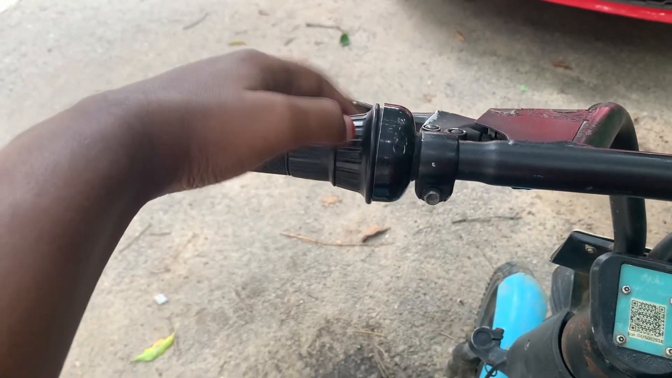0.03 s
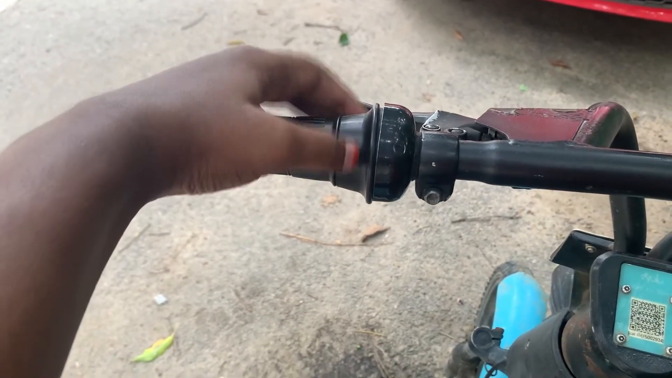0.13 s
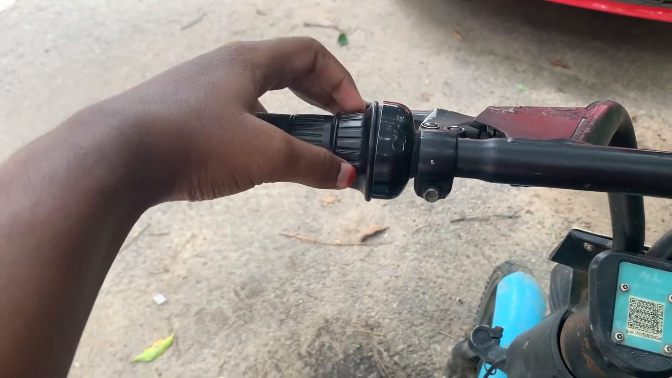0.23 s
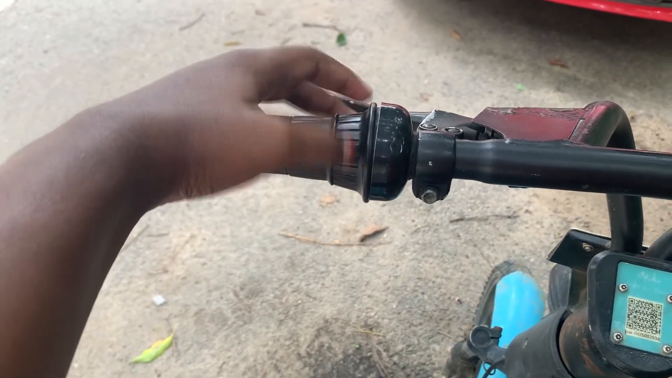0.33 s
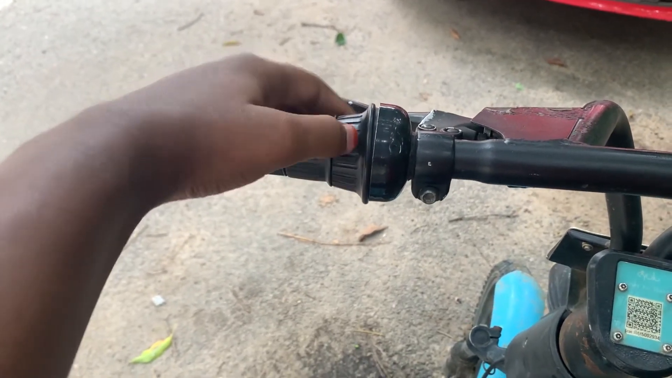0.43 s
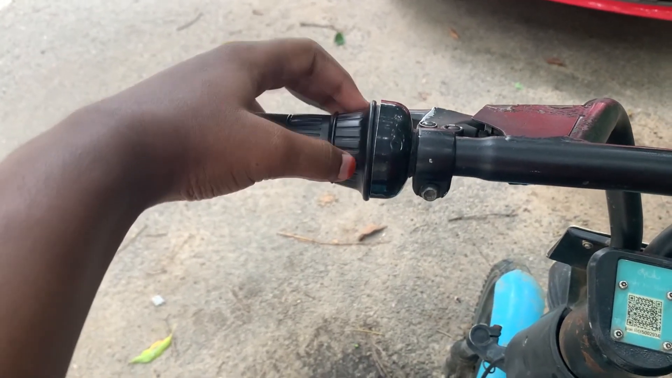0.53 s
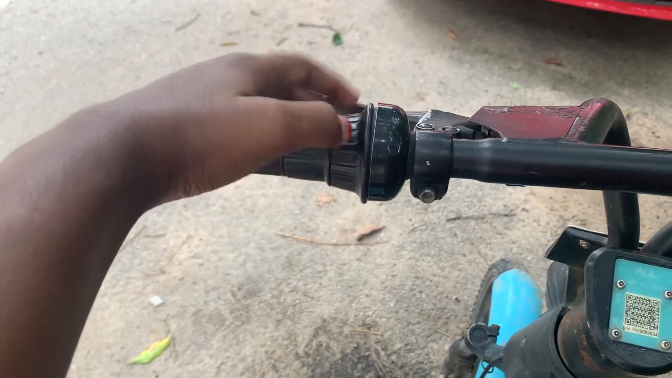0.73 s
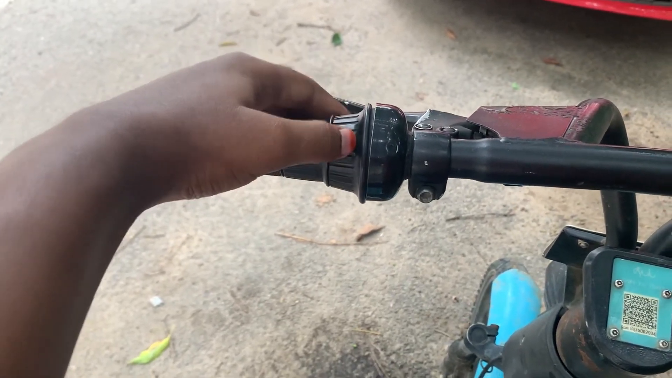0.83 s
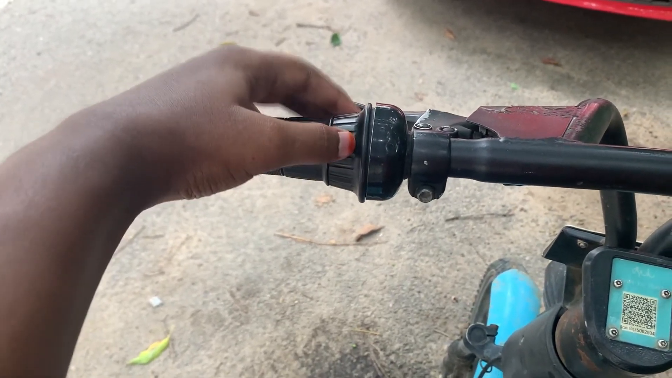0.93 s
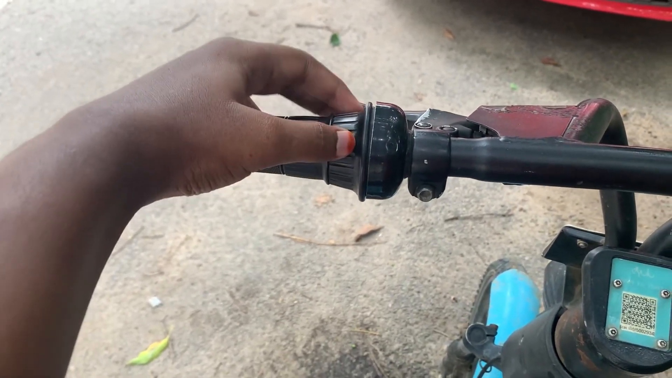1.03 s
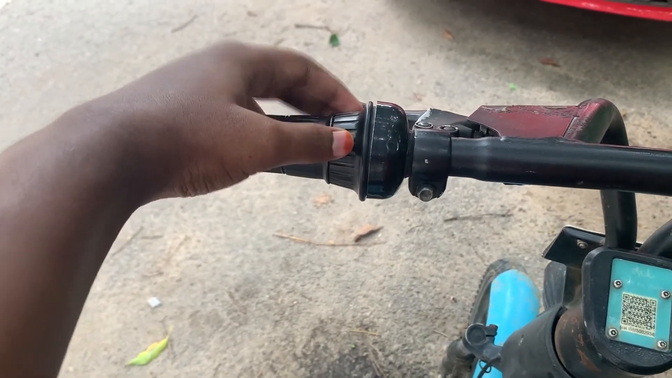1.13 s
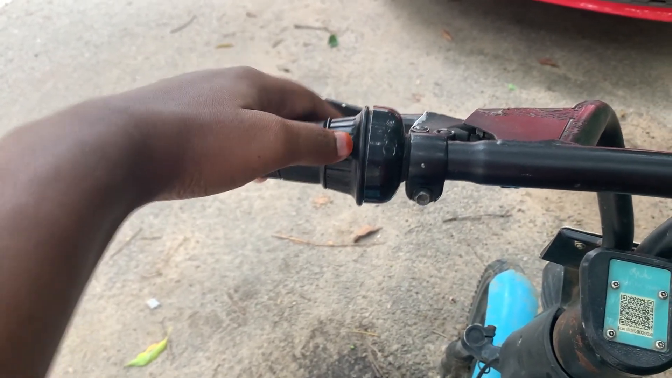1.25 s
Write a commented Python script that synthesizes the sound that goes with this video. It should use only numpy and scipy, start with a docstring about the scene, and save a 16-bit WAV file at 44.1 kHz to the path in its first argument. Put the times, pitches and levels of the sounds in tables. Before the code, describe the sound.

Close, dry and very bright bicycle bell outdoors; ratchet ticks and hand rubbing lead into two tight bursts of metallic dings with rattle, then quiet low rumble, light air hiss and a few faint bird calls.

```python
"""A small twist-grip bicycle bell is rung twice outdoors, close to a stereo microphone, over a still singing ding.
Each twist clicks a pawl and throws the hammer on the dome, twice in quick succession on the first twist.
The dome is a set of sine modes, choked quickly; crack, rattle, end stop and handlebar thud are shaped noise and rings.
The hand rubs the grip close by. Behind lie low rumble and soft hiss as noise, and a few far birds as gliding
or level sines smeared by echoes."""
import sys
import numpy as np
from scipy import signal
from scipy.fft import rfft, irfft
from scipy.io import wavfile

SR = 44100
rng = np.random.default_rng(int(sys.argv[2]) if len(sys.argv) > 2 else 0)


def to_wav(s):
    """Save 16-bit WAV."""
    ch = np.atleast_2d(s).T  # columns
    pcm = np.round(np.clip(ch, -1, 1) * 32767)  # PCM
    wavfile.write(sys.argv[1], SR, pcm.astype(np.int16))


N = 57330
T = np.arange(N) / SR   # s

# Every colour table gives only the shape of a noise spectrum: the noise is then scaled to rms 1.
# Every likeness runs from -1 (left and right opposite) through 0 (unrelated) to 1 (the same).

# Pitches of the dome modes: pitch_hz
DOME_PITCHES = [1304, 3256, 5662, 7886, 8503, 11795, 12395, 15545, 15720]
# The dome modes, same order: struck_db (before blow level), choked_t60_s (before ring length factor),
# earlier_db (before swell), free_t60_s, after_ring_db, left_minus_right_db, left_lead_rad, twin_share (0-1)
DOME_MODES = [(-40.5, 0.046, -68.5, 2.0, -78.5, 8, 1.57, 0), (-51.5, 0.25, -59.5, 2.7, -64, -0.5, -2, 0.8),
              (-30, .075, -43, 1.4, -60, -3.5, 1.92, 0.6), (-40.5, 0.2, -61.5, .2, -80, -11, -3.5, .3),
              (-21, .11, -39.5, 0.41, -39, 0, 3.0, 0.9), (-11, 0.092, -33, 0.18, -39, 0, -1.0, .2),
              (-37, .06, -63, 0.24, -72.5, 4, -0.5, .3), (-11, 0.058, -53.5, 0.14, -56, -0.5, 0.62, .2),
              (-24.5, 0.078, -57, .22, -58, -2.5, -0.2, .3)]
# Swell of the earlier ding: time_s, level_db
EARLIER_SWELL = [(0, -2), (.05, -5.5), (.07, 3.5), (.19, 4)]
# Hammer blows: start_s, level_db, ring_length_factor, strength_db (of crack, rattle and thud),
# rattle_t60_s, low_modes_db (change)
BLOWS = [(0.2006, 0.5, 0.57, -1.5, 0.11, -1.5), (0.2147, -1.5, 0.93, -6.5, 0.039, -7.5),
         (0.5538, 0, .64, -2, .075, -11.5)]
BLOW_ATTACK_S, CONTACT_S = 0.00013, 0.003
HOLD_S = 0.0056   # the chattering hammer keeps full swing this long, divided by the ring length factor
CHOKE_DB, CHOKE_S = 2.5, 0.004   # then it settles and takes this much away
BUZZ_HZ, BUZZ_SPREAD = 110, 0.25   # the touching hammer roughens the choked ring
LOW_MODES_HZ = 4000   # the low modes lie below this
TWIN_GAP_HZ, BEAT_CREST_S = 13.5, 0.018   # split modes make the free ring beat
# A faint unsteady ring outlasts the choke; its t60 is given at the reference pitch
AFTER_REF_T60_S, AFTER_REF_HZ = 0.5, 8500
AFTER_SHORTENS = 0.8   # power of the frequency: higher modes lose it sooner
AFTER_WAVER_HZ, AFTER_WAVER_SPREAD = 25, 0.6

# Close left-right likeness: pitch_hz, likeness
CLOSE_LIKENESS = [(60, 1), (400, 0.71), (1300, 0.5), (2800, -1.1), (5000, 0.85), (7000, .4), (8500, -0.88),
                  (10500, 0.94), (13500, -.3), (15500, .7)]
# Far left-right likeness: pitch_hz, likeness
FAR_LIKENESS = [(60, .93), (150, .8), (400, -0.41), (1000, 0.25), (4000, 0.16), (12000, 0)]

# Far falling chirps: start_s, level_db (before doubling and echoes)
CHIRPS = [(-.04, -57.5), (0.492, -61.5), (1.052, -62)]
CHIRP_HZ, CHIRP_END_HZ, CHIRP_S = 5004, 4427, 0.045
CHIRP_OCTAVE_DB, CHIRP_PAN_DB = -10.5, -4.5
BIRD_ECHO_T60_S, WHISTLE_ECHO_DB = 0.98, -2.5
# Faint far whistles: start_s, length_s, pitch_hz, level_db
WHISTLES = [(.89, 0.12, 1931, -74), (0.973, 0.2, 2294, -76), (1.108, 0.13, 1910, -71),
            (1.22, 0.11, 3450, -73.5)]

# Hand rubbing the grip close by: time_s, level_db
RUB_LEVEL = [(0, -79.5), (.08, -61.5), (.19, -64.5), (.3, -79), (.37, -82), (.47, -73.5), (.535, -59),
             (.6, -97.5), (1.3, -100)]
# Colour of the rubbing: pitch_hz, db_per_hz
RUB_COLOUR = [(50, -15.5), (130, 3.5), (260, 0), (420, -16), (750, -13.5), (1500, -25), (4000, -24.5),
              (16000, -50.5)]

# Low outdoor rumble: time_s, level_db
RUMBLE_LEVEL = [(0, -59), (.12, -53.5), (.25, -69), (.31, -66.5), (.39, -61.5), (.55, -61.5), (.68, -67),
                (.8, -60), (.94, -58.5), (1.05, -53), (1.18, -55.5), (1.3, -55)]
# Colour of the rumble: pitch_hz, db_per_hz
RUMBLE_COLOUR = [(20, -34), (36, -21.5), (52, -2.5), (72, -1), (105, -5.5), (150, -21), (250, -32),
                 (600, -61), (2000, -87)]
# Outdoor hiss: time_s, level_db
AIR_LEVEL = [(0, -70.5), (.1, -63.5), (.19, -59), (.29, -77.5), (.32, -103), (.345, -74.5), (.44, -76),
             (.52, -64), (.63, -75.5), (.88, -74), (.93, -71.5), (.965, -64.5), (1.12, -63.5), (1.3, -64.5)]
# Colour of the hiss: pitch_hz, db_per_hz
AIR_COLOUR = [(60, -3), (180, 11), (270, -13.5), (430, 5), (580, -2), (850, -3), (2200, -9), (3300, -11.5),
              (4600, -9.5), (6500, -24), (9000, -28), (12000, -35.5), (16000, -54.5)]

# Pawl clicks as the grip turns: start_s, level_db
PAWL_CLICKS = [(.1435, -44), (0.1807, -37.5), (.497, -60), (.5368, -36)]
# Colour of the clicks: pitch_hz, db_per_hz
PAWL_COLOUR = [(100, -9.5), (700, -13.5), (1750, -9.5), (2300, 12.5), (3200, -11), (5000, -7), (7700, -4.5),
               (10000, -9.5), (14000, -19.5), (16000, -37)]
PAWL_T60_S = 0.014
PAWL_RING_HZ, PAWL_RING_DB, PAWL_RING_T60_S = 2310, -7, 0.043   # level against the click

# Colour of the crack and rattle under each blow: pitch_hz, db_per_hz
RATTLE_COLOUR = [(30, -16), (80, 9), (220, 1), (450, -14), (800, -9.5), (1250, -2.5), (2600, 3),
                 (4000, -5.5), (5500, 1), (7500, 2.5), (10000, 2), (14000, -2), (16000, -6)]
RATTLE_DB, RATTLE_RISE_S = -25, 0.0032   # level before each blow's strength
CRACK_DB, CRACK_T60_S = -12.5, 0.0034   # level before each blow's strength
# Housing modes rung by the rattle: pitch_hz, level_db (before scaling the sum), t60_s,
# left_minus_right_db, left_lead_rad
HOUSING_MODES = [(1090, -13, 0.014, -1.5, -3.2), (1364, -7, 0.075, 2, 2.3), (1924, -14, .02, 1.5, 3.9),
                 (3910, -0.5, .02, -0.5, 2.0), (5385, -2, 0.011, 0.5, 2.4), (5830, -9, .02, -6, .8),
                 (7900, 0, 0.054, -2.5, 4.1), (7200, -2, 0.04, 1, 3), (9580, -14, .03, -8, 5.2),
                 (9540, -2, .02, -3, 0.14), (15800, -11, 0.01, -7.5, 1.3)]
TAPS_PER_S, TAP_SPREAD_DB = 700, 4.5
HOUSING_DB = -6.5   # against the broad rasp
STOP_S, STOP_DB, STOP_T60_S = 0.5675, -28, 0.025   # the grip knocks on its end stop
# Colour of the end stop: pitch_hz, db_per_hz
STOP_COLOUR = [(100, -9.5), (900, -29.5), (1300, -11.5), (1580, 14), (2100, -40), (5000, -11),
               (16000, -9.5)]

THUD_DB, THUD_T60_S = -39, 0.055   # level before each blow's strength
# Colour of the handlebar thud: pitch_hz, db_per_hz
THUD_COLOUR = [(30, -20.5), (75, 2.5), (130, 2), (220, -2), (420, -10.5), (700, -7), (1050, -5),
               (1800, -18.5), (16000, -60)]

YARD_DB, YARD_T60_S, YARD_DELAY_S = -28.5, 0.56, 0.036   # level for the housing and pawl
DOME_YARD_DB = -35.5   # the dome's yard echo is fainter than that of the housing and pawl
CUTOFF_HZ = 16500


def from_db(db):
    """Decibels to gain."""
    return 10 ** (np.asarray(db) / 20)


def rms_one(x):
    """Scale to unit rms."""
    return x / np.sqrt(np.mean(x ** 2) + 1e-20)


def level(rows):
    """Gain over time from (time_s, level_db) points."""
    return from_db(np.interp(T, *np.transpose(rows)))


def at_hz(points, hz):
    """Read a table on a log-frequency axis."""
    freqs, values = np.transpose(points)
    return np.interp(np.log(hz + 1), np.log(freqs), values)


def pan(db):
    """Left and right gains for a level difference."""
    return from_db(np.array([[db], [-db]]) / 2)


def fade(start, t60, attack):
    """Quick rise at start, then exponential decay by 60 dB per t60."""
    age = np.maximum(T - start, 0)
    return np.clip(age / attack, 0, 1) * from_db(-60 * age / t60)


def noise(colour, likeness):
    """Stereo noise with a given spectrum and left-right likeness; rms 1."""
    hz = np.arange(N // 2 + 1) * SR / N
    mid, side = rfft(rng.standard_normal((2, N))) * from_db(at_hz(colour, hz))
    alike = np.clip(at_hz(likeness, hz), -1, 1)
    shared = np.sqrt(1 + alike) * mid
    opposed = np.sqrt(1 - alike) * side * [[1], [-1]]
    return rms_one(irfft(shared + opposed, N))


def waver(rate_hz):
    """Random wander around zero, spread 1, losing strength above the given rate."""
    hz = np.arange(N // 2 + 1) * SR / N
    spectrum = rfft(rng.standard_normal(N))
    return rms_one(irfft(spectrum / (1 + (hz / rate_hz) ** 2), N))


def echoes(x, t60, delay, channels):
    """Dense dying reflections, of unit energy per channel on average."""
    tail = rng.standard_normal((channels, N)) * fade(delay, t60, 0.01)
    tail /= np.sqrt(np.sum(tail ** 2) / channels)
    return signal.fftconvolve(x, tail, axes=1)[:, :N]


def partial(hz, start, pan_db, lead):
    """One steady mode as the two microphone ports hear it, differing in level and phase."""
    half_leads = np.array([[lead], [-lead]]) / 2
    return pan(pan_db) * np.sin(2 * np.pi * hz * (T - start) + half_leads)


def until(s):
    """A ring ends when the hammer touches the dome again."""
    return np.clip(1 - (T - s) / CONTACT_S, 0, 1)


def earlier_ding():
    """The dome still rings freely, each mode beating with its twin, until the first blow."""
    ring = 0
    for hz, (_, _, db, t60, _, pan_db, lead, twin_share) in zip(DOME_PITCHES, DOME_MODES):
        mode = partial(hz, BEAT_CREST_S, pan_db, lead)
        twin = partial(hz - TWIN_GAP_HZ, BEAT_CREST_S, pan_db, lead)
        ring = ring + from_db(db) * fade(0, t60, 0.002) * (mode + twin_share * twin)
    first_blow_s = BLOWS[0][0]
    return ring * level(EARLIER_SWELL) * until(first_blow_s)


def chirps():
    """Far birds fall in pitch with an octave above; only the echoes of the chirps are heard."""
    calls = 0
    for s, db in CHIRPS:
        progress = np.clip((T - s) / CHIRP_S, 0, 1)
        pitch = CHIRP_HZ + (CHIRP_END_HZ - CHIRP_HZ) * progress
        phase = 2 * np.pi * np.cumsum(pitch) / SR
        swell = 2 * np.sqrt(progress * (1 - progress))   # rounded, 1 in the middle
        tone = np.sin(phase) + from_db(CHIRP_OCTAVE_DB) * np.sin(2 * phase)
        calls = calls + from_db(db) * swell * 2 * tone
    return pan(CHIRP_PAN_DB) * echoes(calls[None], BIRD_ECHO_T60_S, 0, channels=2)


def hand():
    """Dull rubbing of the hand on the grip as it winds up, made of shaped noise."""
    return level(RUB_LEVEL) * noise(RUB_COLOUR, CLOSE_LIKENESS)


def outdoors():
    """Low rumble and soft hiss of the surroundings, two noises of changing level."""
    rumble = level(RUMBLE_LEVEL) * noise(RUMBLE_COLOUR, FAR_LIKENESS)
    hiss = level(AIR_LEVEL) * noise(AIR_COLOUR, FAR_LIKENESS)
    return rumble + hiss


def pawl():
    """Small noisy ticks with a short ring of the pawl's own as the grip turns."""
    ticks, rings = 0, 0
    for s, db in PAWL_CLICKS:
        ticks = ticks + from_db(db) * fade(s, PAWL_T60_S, 0.00033)
        ring = fade(s, PAWL_RING_T60_S, 0.002) * partial(PAWL_RING_HZ, s, 0, 0)
        rings = rings + from_db(db + PAWL_RING_DB) * ring
    return ticks * noise(PAWL_COLOUR, CLOSE_LIKENESS) + rings


def dings():
    """Each blow restarts the modes; they hold, then the buzzing hammer chokes them to a faint after-ring."""
    out = 0
    ends = [row[0] for row in BLOWS[1:]] + [N / SR]
    unsteady = [(BUZZ_SPREAD * waver(BUZZ_HZ), AFTER_WAVER_SPREAD * waver(AFTER_WAVER_HZ))
                for _ in DOME_MODES]
    for (s, blow_db, length, _, _, low_db), end in zip(BLOWS, ends):
        settled = np.maximum(T - s - HOLD_S / length, 0)   # time since the hold ended
        sounding = np.clip((T - s) / BLOW_ATTACK_S, 0, 1) * until(end)
        swing_db = blow_db - CHOKE_DB * (1 - np.exp(-settled / CHOKE_S))
        touching = np.minimum(settled / CHOKE_S, 1)
        for hz, mode, (buzz, sway) in zip(DOME_PITCHES, DOME_MODES, unsteady):
            db, t60, _, _, after_db, pan_db, lead, _ = mode
            choked = from_db(swing_db + db - 60 * settled / (t60 * length)) * (1 + buzz * touching)
            after_t60 = AFTER_REF_T60_S * (AFTER_REF_HZ / hz) ** AFTER_SHORTENS
            after = from_db(after_db) * fade(s, after_t60, 0.0065) * (1 + sway)
            low_gain = from_db(low_db * (hz < LOW_MODES_HZ))
            out = out + low_gain * sounding * (choked + after) * partial(hz, s, pan_db, lead)
    return out


def rattle():
    """Loose parts tap unevenly on the housing's modes, over a broad rasp."""
    struck = rng.random(N) < TAPS_PER_S / SR
    sign = rng.choice([-1, 1], N)
    strength = from_db(TAP_SPREAD_DB * np.clip(rng.standard_normal(N), -2, 2))
    taps = struck * sign * strength
    body = 0   # response of the housing to one tap
    for hz, db, t60, pan_db, lead in HOUSING_MODES:
        body = body + from_db(db - 60 * T / t60) * partial(hz, 0, pan_db, lead)
    ringing = rms_one(signal.fftconvolve(taps[None], body, axes=1)[:, :N])
    return from_db(HOUSING_DB) * ringing + noise(RATTLE_COLOUR, CLOSE_LIKENESS)


def housing():
    """Each blow cracks and shakes the housing; later the grip knocks on its end stop."""
    shaken, cracks = 0, 0
    for s, _, _, db, t60, _ in BLOWS:
        shaken = shaken + from_db(RATTLE_DB + db) * fade(s, t60, RATTLE_RISE_S)
        cracks = cracks + from_db(CRACK_DB + db) * fade(s, CRACK_T60_S, 0.00024)
    stop = from_db(STOP_DB) * fade(STOP_S, STOP_T60_S, 0.001)
    crack_noise = cracks * noise(RATTLE_COLOUR, CLOSE_LIKENESS)
    stop_noise = stop * noise(STOP_COLOUR, CLOSE_LIKENESS)
    return shaken * rattle() + crack_noise + stop_noise


def thud():
    """The dull answer of the handlebar to each blow, a short burst of dark noise."""
    thuds = sum(from_db(THUD_DB + db) * fade(s, THUD_T60_S, 0.003) for s, _, _, db, _, _ in BLOWS)
    return thuds * noise(THUD_COLOUR, CLOSE_LIKENESS)


def whistles():
    """Thin level whistles of far birds, direct and with their echoes."""
    calls = 0
    for s, length, hz, db in WHISTLES:
        swell = np.sin(np.pi * np.clip((T - s) / length, 0, 1))
        calls = calls + from_db(db) * swell * np.sin(2 * np.pi * hz * T)
    return calls + from_db(WHISTLE_ECHO_DB) * echoes(calls[None], BIRD_ECHO_T60_S, 0, channels=2)


def scene():
    """The close bell with its faint yard echo, over the background."""
    dome = earlier_ding() + dings()
    works = housing() + pawl()
    sent = from_db(DOME_YARD_DB) * dome + from_db(YARD_DB) * works
    yard = echoes(sent, YARD_T60_S, YARD_DELAY_S, channels=1)
    return dome + works + yard + hand() + chirps() + whistles() + outdoors() + thud()


def record(dry):
    """Peaks stop at full scale, then a steep low-pass cuts the top."""
    clipped = np.clip(dry, -1, 1)
    low_pass = signal.cheby1(12, 0.1, CUTOFF_HZ, fs=SR, output="sos")
    return signal.sosfilt(low_pass, clipped)


dry = scene()
out = record(dry)
to_wav(out)
```